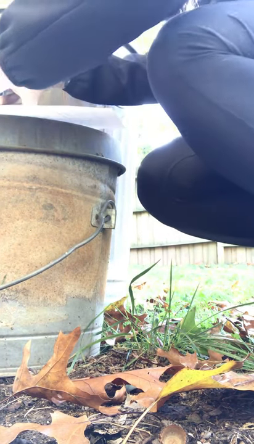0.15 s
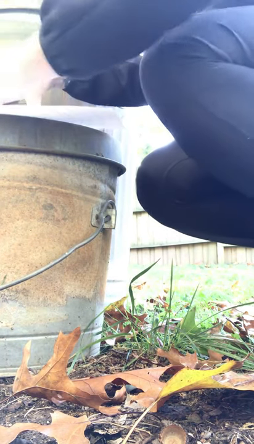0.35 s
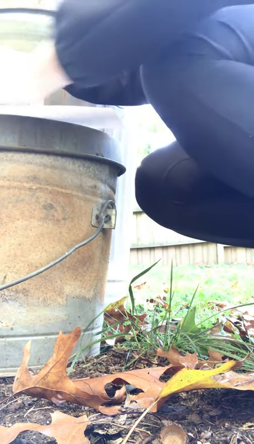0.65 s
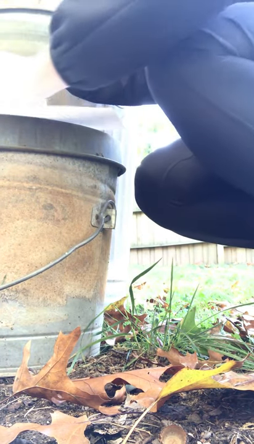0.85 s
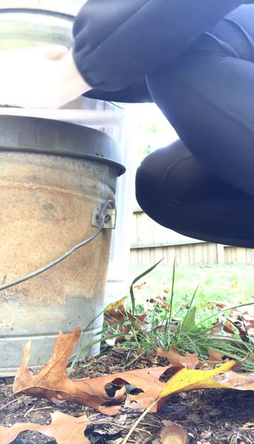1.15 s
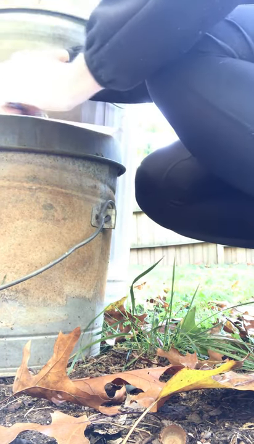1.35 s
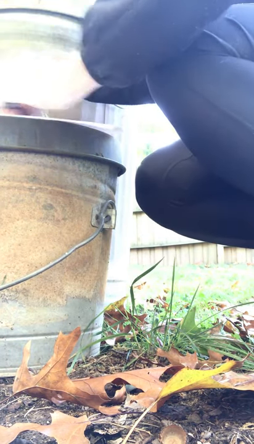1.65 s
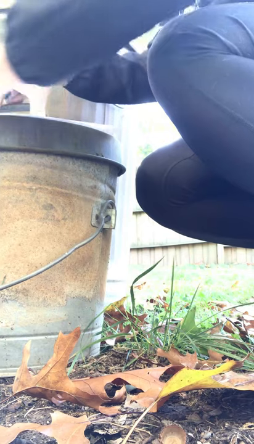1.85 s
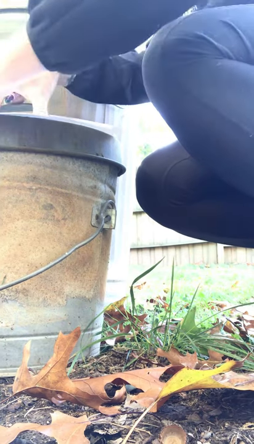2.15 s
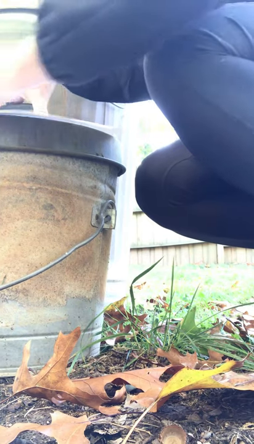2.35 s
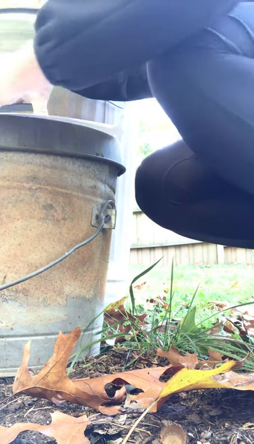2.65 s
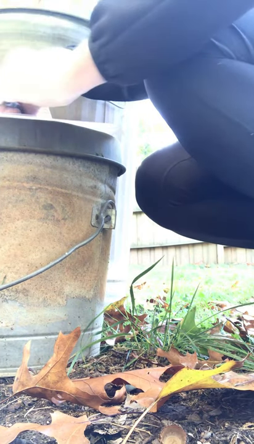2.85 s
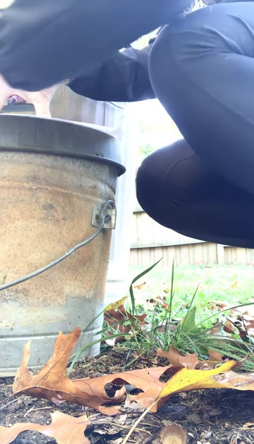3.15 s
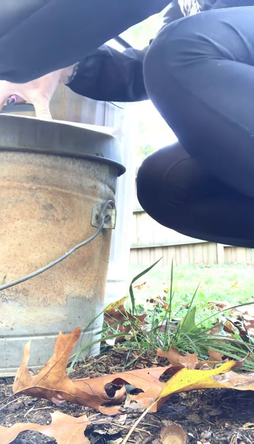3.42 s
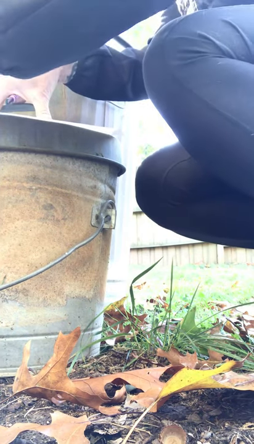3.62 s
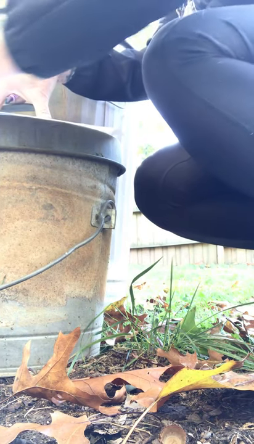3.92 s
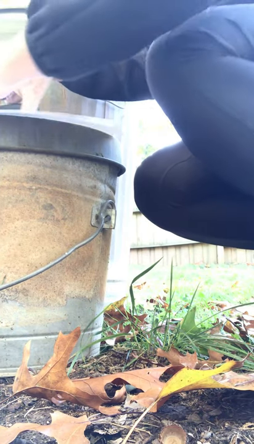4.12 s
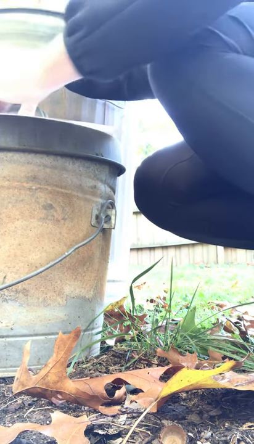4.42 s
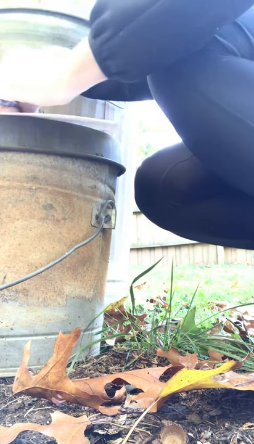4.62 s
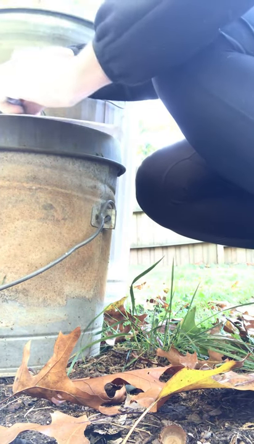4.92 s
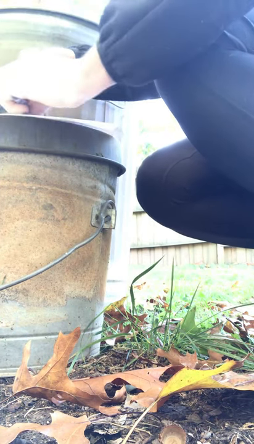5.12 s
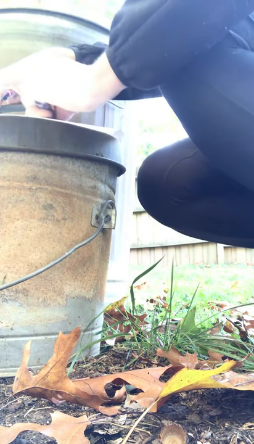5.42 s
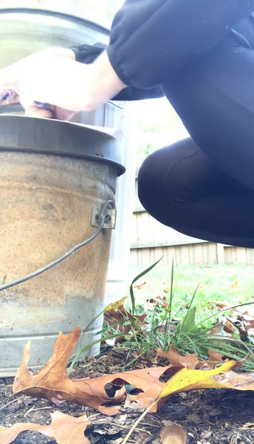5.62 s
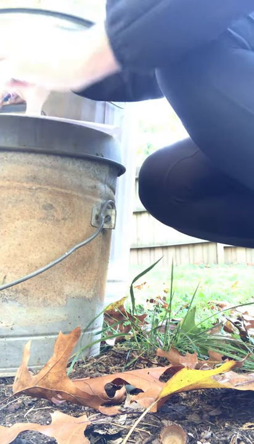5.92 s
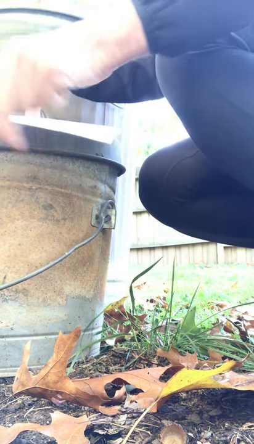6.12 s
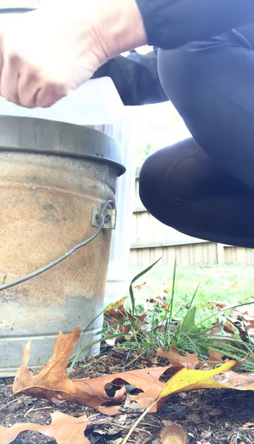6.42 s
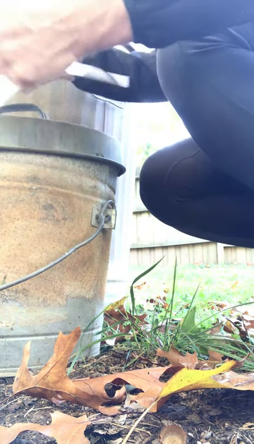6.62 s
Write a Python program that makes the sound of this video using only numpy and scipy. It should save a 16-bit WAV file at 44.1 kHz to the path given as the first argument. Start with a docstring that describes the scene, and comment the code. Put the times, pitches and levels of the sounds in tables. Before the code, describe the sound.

Crayon scrubbed quickly back and forth over paper on a metal bin lid outdoors, dry scratchy strokes and dull thuds, ending in sharp paper crackles.

```python
"""Crayon rubbing on a bin lid

Outdoors, a crayon is rubbed back and forth over paper laid on a metal bin lid, above a low rumble, a hum and air.
Random slips of the wax hiss, rasp and scratch through sheet resonances, and coarser catches drum the lid dully.
Narrow resonances squeak faintly, ridges give bumps, and the sheet snaps now and then.
At the end the sheet is shifted and crackles: clusters of cracks ring it and tap the lid."""
import sys
import numpy as np
from scipy import signal
from scipy.fft import rfft, irfft
from scipy.io import wavfile

SR = 44100
rng = np.random.default_rng(int(sys.argv[2]) if len(sys.argv) > 2 else 0)


def transcribe(u):
    """Save the signal u as a 16-bit wav file named by the first command-line argument.

    u: samples, shape (n,) or (channels, n), limited to [-1, 1]; the rate is SR.
    q: integer samples, one column per channel.
    """
    v = np.clip(np.atleast_2d(u).T, -1, 1)
    q = np.round(v * 32767).astype(np.int16)
    wavfile.write(sys.argv[1], SR, q)


N = 298557
TIME = np.arange(N) / SR


def from_db(db):
    """Decibels to gain."""
    return 10 ** (np.asarray(db) / 20)


def rms_one(x):
    """Scale to unit power."""
    return x / np.sqrt(np.mean(x ** 2) + 1e-20)


def follow(curve, at):
    """Read a table of (position, dB) by straight lines between its points."""
    return np.interp(at, *np.transpose(curve))


def coloured(x, spectrum):
    """Give a signal a smooth spectrum, joined up along log frequency; rms 1."""
    hz, db = np.transpose(spectrum)
    bins = np.maximum(np.fft.rfftfreq(N, 1 / SR), 1)
    gain = from_db(np.interp(np.log(bins), np.log(hz), db))
    return rms_one(irfft(rfft(x) * gain, N))


def band(x, low_hz, high_hz):
    """Gentle band-pass."""
    return signal.sosfilt(signal.butter(2, [low_hz, high_hz], "band", fs=SR, output="sos"), x)


def drift(rate):
    """Random wander in straight segments, `rate` of them a second; rms 1."""
    knots = rng.standard_normal(4096)
    return rms_one(np.interp(TIME * rate, np.arange(len(knots)), knots))


def resonate(x, modes):
    """Parallel two-pole resonances of alternating sign; a wider mode dies away sooner."""
    out = np.zeros(len(x))
    for k, (hz, width, db) in enumerate(modes):
        r = np.exp(-np.pi * width / SR)
        poles = [1, -2 * r * np.cos(2 * np.pi * hz / SR), r * r]
        ring = signal.lfilter([1, 0, -1], poles, x + 1e-18)
        out += (-1) ** k * from_db(db) * (1 - r * r) / 2 * ring
    return out


def body(x, modes):
    """Resonances that pass white noise at unchanged power."""
    impulse_response = resonate(signal.unit_impulse(SR // 2), modes)
    return resonate(x, modes) / np.linalg.norm(impulse_response)


def grains(per_s, spread_db):
    """Clicks of random sign at random moments; sizes vary, skewed up (or down if negative); rms 1."""
    sizes = from_db(spread_db * np.minimum(rng.exponential(1, N), 4))
    signs = rng.choice([-1, 1], N)
    happens = rng.random(N) < per_s / SR
    return rms_one(sizes * signs * happens)


def bursts(times, levels_db, rise, decay):
    """Envelope of sudden releases: a quick rise, then an exponential fall (both in s); powers add."""
    power, age = np.zeros(N), np.arange(SR // 2) / SR
    shape = (1 - np.exp(-age / rise)) * np.exp(-age / decay)
    for s, db in zip(times, levels_db):
        at = int(s * SR)
        power[at:at + len(age)] += (from_db(db) * shape[:N - at]) ** 2
    return np.sqrt(power)


# tone of the low rumble: (f/Hz, relative density/dB)
RUMBLE_SPECTRUM = [(20, -22), (32, -8.5), (45, -4.5), (56, -2), (72, -3), (90, -2), (115, -4.5),
                   (150, -10.5), (220, -18.5), (330, -18.5), (600, -49.5)]
# swelling of the low rumble, before its trim: (t/s, level/dB)
RUMBLE_SWELL = [(0.0, -55), (0.32, -49), (0.89, -54.5), (0.92, -41), (0.98, -52), (1.17, -41.5),
                (1.66, -45), (1.73, -40), (1.85, -50), (1.88, -40.5), (2.37, -45.5), (3.47, -46.5),
                (3.51, -52), (3.56, -42.5), (4.86, -44), (5.09, -51), (6.69, -45.5), (6.77, -43.5)]
# strength of the deep hum, before its trim and waver: (t/s, level/dB)
HUM_LEVEL = [(0.0, -50), (0.15, -44), (0.56, -47.5), (1.96, -39), (2.13, -55), (2.19, -40.5), (2.39, -38),
             (2.49, -47), (2.56, -38), (2.75, -49), (4.0, -35.5), (4.54, -49), (4.75, -34), (4.79, -47),
             (4.84, -35), (5.19, -54), (5.37, -47), (5.51, -57), (5.69, -37.5), (5.75, -46), (6.75, -42.5),
             (6.77, -50)]
# tone of the quiet outdoor air: (f/Hz, relative density/dB)
AIR_SPECTRUM = [(30, -13), (60, 7), (150, -5), (330, -1.5), (480, -9), (750, -15.5), (1050, -16),
                (1600, -20), (3000, -25.5), (6000, -30), (9000, -34.5), (10400, -39), (12200, -37),
                (15500, -40.5)]
AIR_DB = -52.5
RUMBLE_TRIM_DB, HUM_TRIM_DB = 2.5, -1.0
HUM_HZ = 62.47   # centre of a slightly wandering pitch
WAVER_DB, WAVERS_PER_S = 1.7, 11   # the hum's level wavers at random


def background():
    """Shaped noise swells as rumble; a wandering sine and narrow noise hum; steady noise is the air."""
    swell = from_db(RUMBLE_TRIM_DB + follow(RUMBLE_SWELL, TIME))
    waver = WAVER_DB * drift(WAVERS_PER_S)
    drone = from_db(HUM_TRIM_DB + follow(HUM_LEVEL, TIME) + waver)
    low_pass = signal.butter(2, 600, fs=SR, output="sos")
    rumble = signal.sosfilt(low_pass, coloured(rng.standard_normal(N), RUMBLE_SPECTRUM))
    phase = 2 * np.pi * np.cumsum(HUM_HZ + 0.73 * drift(3.02)) / SR
    throb = rms_one(band(rng.standard_normal(N), 48.0, 63.2))
    hum = np.sqrt(2) * np.sin(phase) + from_db(-8.0) * throb
    air = from_db(AIR_DB) * coloured(rng.standard_normal(N), AIR_SPECTRUM)
    return swell * rumble + drone * hum + air


# sweeps over the paper, before the mix: (t of top speed/s, length/s, hiss level/dB, rasp level/dB)
STROKES = [(0.03, 0.12, -72, -57.5), (0.189, 0.23, -60, -52.5), (0.368, 0.2, -62.5, -59.5),
           (0.563, 0.23, -59, -59), (0.728, 0.14, -64, -61), (0.882, 0.19, -60, -63.5),
           (1.037, 0.15, -61.5, -63), (1.166, 0.19, -57, -62.5), (1.252, .12, -62.5, -62.5),
           (1.384, 0.17, -62, -68), (1.634, 0.19, -54, -56), (1.754, 0.23, -59, -56),
           (1.983, 0.22, -60.5, -62.5), (2.16, 0.14, -69, -63.5), (2.31, 0.24, -58.5, -59.5),
           (2.508, 0.22, -62, -65), (2.695, 0.23, -58.5, -66.5), (2.757, 0.081, -56, -51),
           (2.894, 0.3, -56, -55.5), (3.044, 0.27, -57.5, -50.5), (3.225, 0.16, -62, -63),
           (3.355, 0.13, -72, -71), (3.55, 0.31, -73.5, -78), (3.795, .22, -59.5, -64.5),
           (3.899, 0.14, -61, -62), (4.008, 0.19, -65.5, -75), (4.21, 0.15, -63, -69),
           (4.336, 0.15, -68.5, -72), (4.469, 0.18, -61, -63), (4.696, .16, -61.5, -69),
           (4.93, 0.097, -67, -60), (5.013, .12, -71, -64.5), (5.122, 0.14, -74, -56),
           (5.212, 0.14, -73, -60), (5.316, 0.12, -66.5, -57), (5.398, .09, -74, -64.5),
           (5.52, 0.17, -67, -63), (5.676, 0.14, -63.5, -55), (6.008, 0.14, -78, -65.5),
           (6.18, 0.29, -74, -58), (6.369, 0.091, -58.5, -56.5), (6.52, .22, -59.5, -58.5),
           (6.708, 0.24, -59.5, -56.5)]
# how readily the lid drums under the part of the sheet being rubbed: (t/s, level/dB)
LID_DRUMMING = [(0, -52), (1.0, -49), (1.75, -51), (2.2, -52), (3.1, -59.5), (3.9, -48.5), (4.75, -55),
                (5.17, -43.5), (5.55, -49.5), (6.77, -50)]
SCRATCH_KNEE_DB, SCRATCH_GROWTH = -41.5, 1.27   # scratch level grows faster than rasp, meeting it at the knee
LID_FOLLOWS, USUAL_RASP_DB = 0.45, -61.5   # the lid takes this share of a sweep's departure from the usual rasp


def stroke_levels(hiss_power, rasp_power, lid_power):
    """Hiss, rasp, scratch and lid gains: powers of each sweep's speed, which falls to zero at its ends."""
    energy = np.zeros((4, N))
    powers = np.array([hiss_power, rasp_power, rasp_power, lid_power])[:, None]
    for s, length, hiss_db, rasp_db in STROKES:
        during = np.abs(TIME - s) < length / 2
        speed = np.abs(np.cos(np.pi * (TIME[during] - s) / length))
        scratch_db = SCRATCH_KNEE_DB + SCRATCH_GROWTH * (rasp_db - SCRATCH_KNEE_DB)
        lid_db = follow(LID_DRUMMING, s) + LID_FOLLOWS * (rasp_db - USUAL_RASP_DB)
        top_gains = from_db([hiss_db, rasp_db, scratch_db, lid_db])[:, None]
        energy[:, during] += (top_gains * speed ** powers) ** 2
    return np.sqrt(energy)


# tone of the fine hiss: (f/Hz, relative density/dB)
HISS_SPECTRUM = [(500, -27), (1000, -1), (2500, 2), (3300, -1.5), (5000, 1), (7000, 0.5), (9200, 1.5),
                 (10400, -4), (12200, 0), (15500, -5.5)]
# low resonances of the sheet pressed against the lid: (f/Hz, width/Hz, relative level/dB)
RASP_MODES = [(1576, 450, -9.5), (1926, 440, -4), (2213, 124, 2), (2376, 93, -0.5), (2533, 130, 0.5),
              (2785, 260, -3), (3120, 150, -11)]
# high resonances of the sheet near the crayon tip: (f/Hz, width/Hz, relative level/dB)
SCRATCH_MODES = [(3420, 280, -5.5), (3880, 210, -3), (4270, 290, -1), (4570, 180, 1.5), (5000, 290, -2),
                 (5550, 240, -2), (6710, 730, -7.5)]
# resonances of the lid, damped by the hand: (f/Hz, width/Hz, relative level/dB)
LID_MODES = [(189.5, 18, -8.5), (256, 29, -8), (312.3, 26, -1), (359.3, 23.2, 4), (412, 38, -3),
             (467.8, 27, -3), (547, 41, -13.5), (622, 13.6, -1.5), (742, 27, -15.5), (895.7, 25, -13),
             (952, 13.3, -10.5), (1130, 108, -17), (1552, 18, -21.5)]


def rubbing():
    """Fine slips of the wax hiss, coarser ones ring the sheet, and the sparsest catches drum the lid."""
    hiss, rasp, scratch, lid = stroke_levels(hiss_power=1.7, rasp_power=1.16, lid_power=1.0)
    grip = drift(70)   # the wax grips unevenly
    hissing = coloured(grains(per_s=25000, spread_db=4.0), HISS_SPECTRUM) * hiss * from_db(1.1 * grip)
    slips = grains(per_s=5000, spread_db=1.5) * from_db(1.3 * grip)
    catches = grains(per_s=1200, spread_db=2.0) * from_db(2.16 * grip)
    drumming = band(body(catches * lid, LID_MODES), 106, 1730)
    rasping = band(body(slips * rasp, RASP_MODES), 1440, 3900)
    scratching = band(body(slips * scratch, SCRATCH_MODES), 2570, 8900)
    paper = from_db(1.1) * hissing + from_db(-1.05) * rasping + from_db(-0.5) * scratching
    return paper + from_db(-1.5) * drumming


# the wax sings faintly, before the reflections: (t of peak/s, half-length/s, f/Hz, level/dB)
SQUEAKS = [(0.162, 0.083, 4760, -57), (1.676, 0.063, 4470, -57.5), (2.738, 0.04, 5200, -52.5),
           (2.997, 0.069, 5040, -58), (3.09, 0.034, 4000, -52.5), (4.94, 0.02, 5400, -57.5),
           (6.537, 0.095, 4100, -59)]


def squeaks():
    """Sticking and slipping wax: random slips excite a narrow, hissy resonance that swells and fades."""
    out = np.zeros(N)
    for s, half_length, hz, db in SQUEAKS:
        swell = np.cos(np.pi / 2 * np.clip((TIME - s) / half_length, -1, 1)) ** 2
        ring = resonate(grains(per_s=3300, spread_db=1.5), [(hz, 300, 0)])
        out += from_db(db) * swell * rms_one(band(ring, hz - 700, hz + 700))
    return out


# the crayon bumps over a ridge of the lid: (t/s, nominal level/dB, boom level relative to it/dB)
BUMPS = [(0.18, -38, -9), (0.613, -34, -11), (0.917, -34, -19), (0.934, -36, -19), (1.172, -31.5, -2),
         (1.387, -35.5, 3), (1.432, -43, 7.5), (1.749, -38.5, -10), (1.884, -53.5, 11), (1.983, -41.5, -4),
         (2.706, -39, 3), (3.829, -43.5, 3), (3.899, -38, -7), (4.208, -45, -2), (4.458, -39, -7),
         (4.7, -39.5, -4), (4.93, -30.5, -10), (4.946, -36, -1), (5.141, -35, -1.5), (5.501, -35.5, -2.5),
         (5.665, -37, -20), (6.185, -36.5, -4), (6.367, -35.5, -8)]
# the whole lid flexing: (f/Hz, width/Hz, relative level/dB)
FLEX_MODES = [(109.5, 31, -1.5), (189, 32, -1.5), (251.5, 36, -1.5)]
SCUFF_DB = -15.5   # drive of the paper's scuff, relative to a bump's nominal level


def bumps():
    """The crayon drops off a ridge: a blow and a short judder thud and flex the lid, and the paper scuffs."""
    s, db, boom_db = np.transpose(BUMPS)
    blows, heaves = np.zeros((2, N))
    at = (s * SR).astype(int)
    blows[at] = from_db(db)
    heaves[at] = from_db(db + boom_db)
    judder = grains(per_s=4000, spread_db=-1.5)
    push = from_db(19) * blows + from_db(-6.5) * judder * bursts(s, db, rise=0.0004, decay=0.011)
    scuff = judder * bursts(s, db + SCUFF_DB, rise=0.0025, decay=0.017)
    thud = band(body(push, LID_MODES), 104, 1430)
    boom = from_db(27.0) * band(body(heaves, FLEX_MODES), 93, 316)
    paper = from_db(-2.5) * body(scuff, RASP_MODES) + from_db(-4.5) * body(scuff, SCRATCH_MODES)
    return thud + boom + paper + from_db(-14.5) * scuff


# the sheet buckles: (t/s, nominal level/dB, sharpness as extra crack level/dB)
SNAPS = [(0.758, -42, -6), (1.0608, -43, -4), (2.5415, -41.5, -4), (3.9008, -35, -10), (3.929, -42, -8),
         (3.9526, -45, -10), (5.125, -33.5, -2), (5.1428, -30.5, -7), (5.171, -38.5, -10),
         (6.009, -39, 2.5), (6.111, -47.5, 14), (6.144, -27.5, -2.5), (6.1664, -26.5, 8), (6.21, -37, -13),
         (6.287, -42, 0), (6.348, -36, 0), (6.3656, -26.5, 2), (6.4123, -35.5, -6), (6.648, -32, 4),
         (6.6631, -19, 1), (6.679, -50, 0), (6.7116, -28.5, 1), (6.7348, -33, 2), (6.751, -29, 4.5)]
# flapping resonances of the loose sheet: (f/Hz, width/Hz, relative level/dB)
FLAP_MODES = [(890, 59, -24), (1150, 33, -25), (1630, 58, -7), (1947, 144, 1.5), (2136, 80, 2),
              (2330, 83, 3), (2520, 99, -7), (2890, 290, -5)]
# cracking resonances of the loose sheet: (f/Hz, width/Hz, relative level/dB)
CRACK_MODES = [(3520, 85, 2), (3980, 300, 3), (4020, 360, -4), (4510, 430, -4), (5460, 190, -15),
               (6100, 270, -9.5), (7000, 120, -17)]
CRACK_DB, TICK_DB, RATTLE_DB = -12, -29, -15   # drives relative to a buckle, before sharpness and mix
TICK_GROWTH = 1.84   # dB of tick per dB of sharpness


def snaps():
    """Each buckle is a tight cluster of cracks that rings the loose sheet, which taps and rattles on the lid."""
    s, db, sharp_db = np.transpose(SNAPS)
    cracks = grains(per_s=14000, spread_db=2.0)
    buckle = cracks * bursts(s, db, rise=0.00042, decay=0.0047)
    flap = band(body(buckle, FLAP_MODES), 690, 5200)
    slap = rms_one(band(cracks, 1460, 3110)) * bursts(s, db, rise=0.00021, decay=0.0031)
    crack_burst = bursts(s, db + CRACK_DB + sharp_db, rise=0.00021, decay=0.0038)
    crack = band(body(cracks * crack_burst, CRACK_MODES), 2700, 8700)
    tick_burst = bursts(s, db + TICK_DB + TICK_GROWTH * sharp_db, rise=0.00078, decay=0.0077)
    tick = coloured(cracks, HISS_SPECTRUM) * tick_burst
    rattling = rms_one(band(grains(per_s=1600, spread_db=-7.0), 630, 3000))
    rattle = rattling * bursts(s, db + RATTLE_DB, rise=0.0097, decay=0.024)
    tap = band(body(buckle, LID_MODES), 475, 1360)
    sheet = from_db(-5) * flap + from_db(-5.5) * slap + from_db(-1.0) * crack + tick
    return sheet + from_db(-6.5) * rattle + from_db(-5) * tap


# reflections off the arm, the legs and the ground: (mean delay/s, level relative to direct sound/dB)
REFLECTIONS = [(.0021, -12), (.0037, -13.5), (.0058, -10.5), (.0093, -10)]


def surroundings(x):
    """Near reflections, whose path lengths drift at random, colour the direct sound."""
    out = x.copy()
    for delay, db in REFLECTIONS:
        path = delay + .00007 * drift(4)   # s
        out += from_db(db) * np.interp(TIME - path, TIME, x, left=0)
    return from_db(-1.5) * out


def scene():
    """Crayon, sheet and lid with their near reflections, over the background."""
    handled = rubbing() + squeaks() + bumps() + snaps()
    return (surroundings(handled) + background())[None]


CUTOFF_HZ = 15750


def record(dry):
    """The microphone drops the deepest bass; the top is cut steeply."""
    thinned = signal.sosfilt(signal.butter(2, 22, "high", fs=SR, output="sos"), dry)
    return signal.sosfilt(signal.ellip(12, .1, 80, CUTOFF_HZ, fs=SR, output="sos"), thinned)


dry = scene()
out = record(dry)
transcribe(out)
```